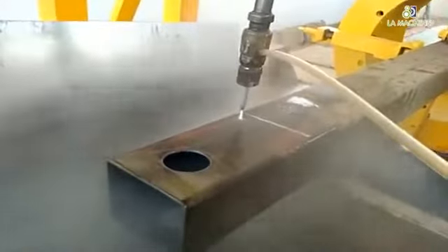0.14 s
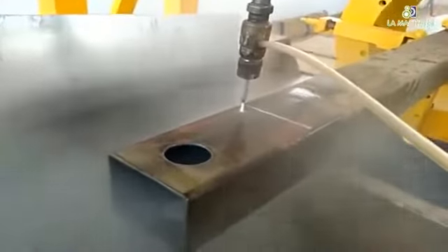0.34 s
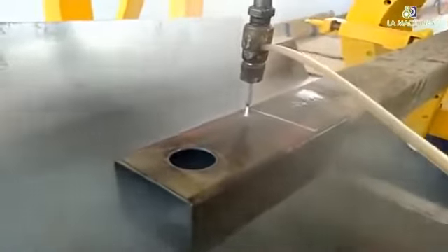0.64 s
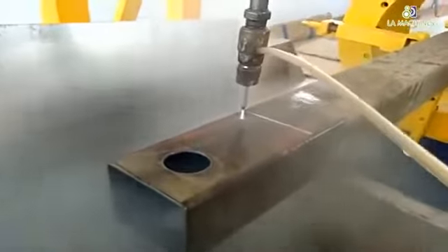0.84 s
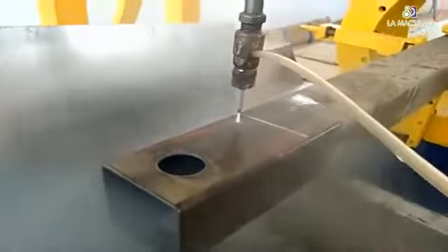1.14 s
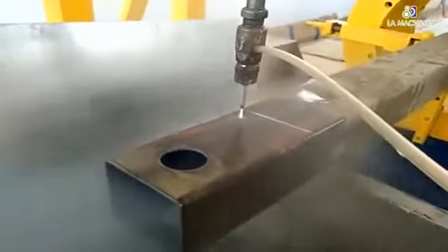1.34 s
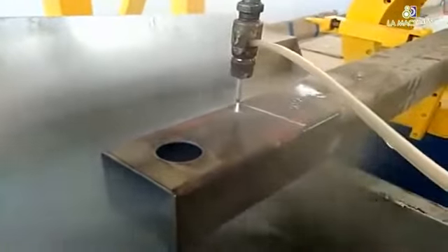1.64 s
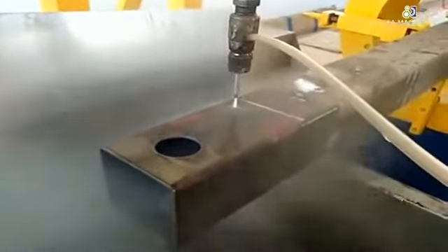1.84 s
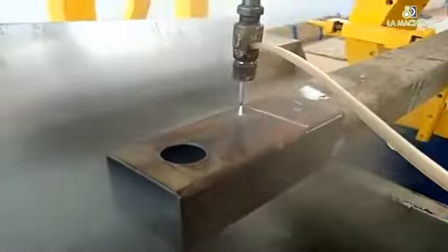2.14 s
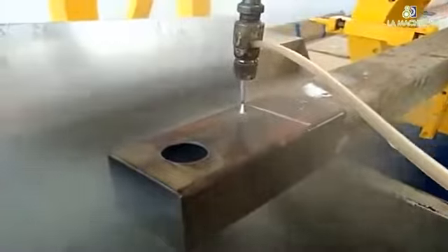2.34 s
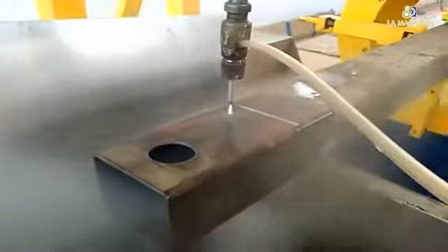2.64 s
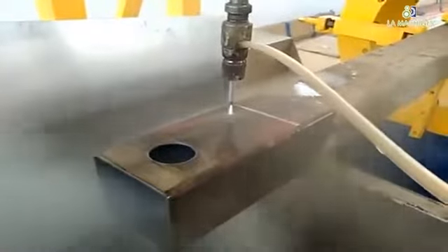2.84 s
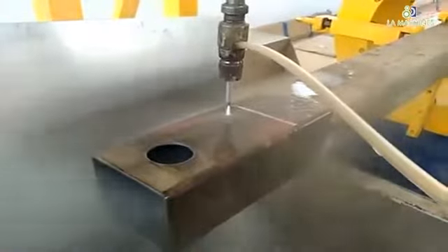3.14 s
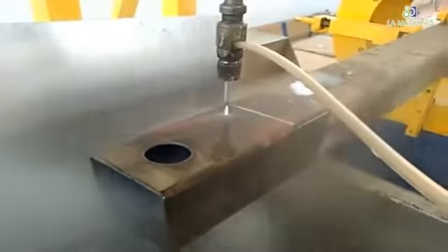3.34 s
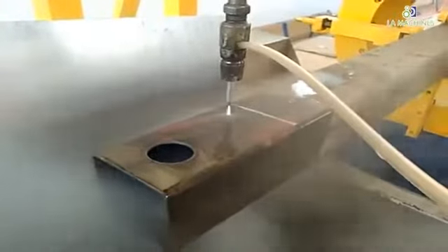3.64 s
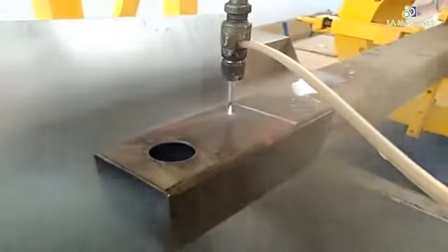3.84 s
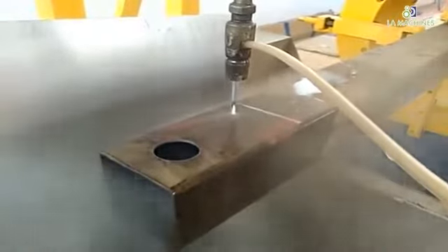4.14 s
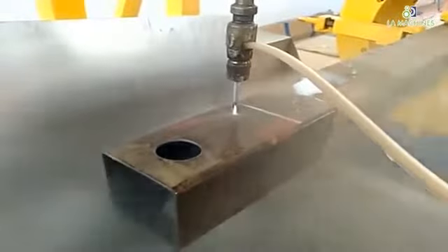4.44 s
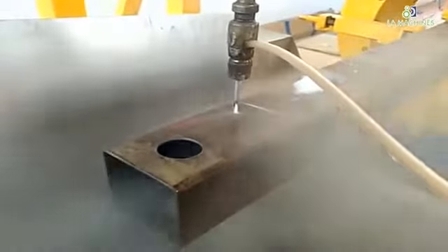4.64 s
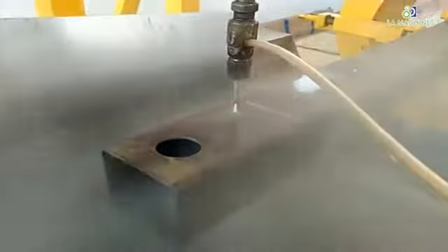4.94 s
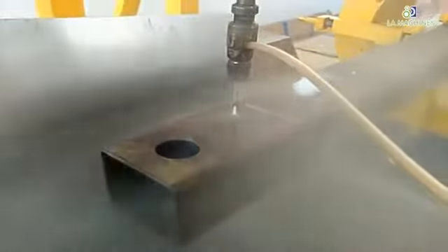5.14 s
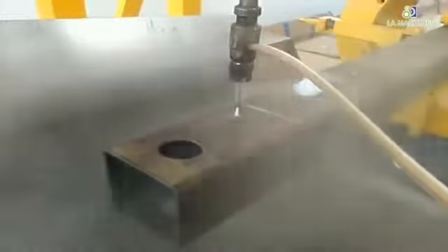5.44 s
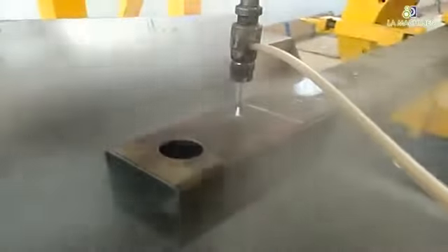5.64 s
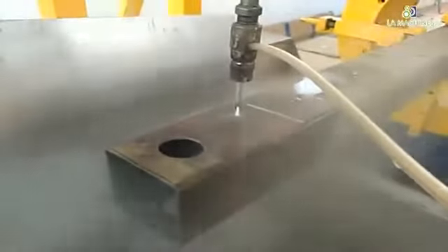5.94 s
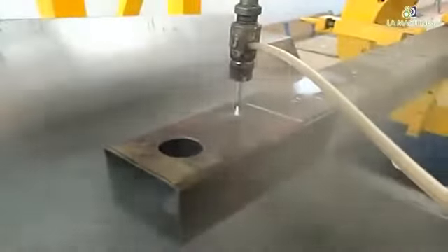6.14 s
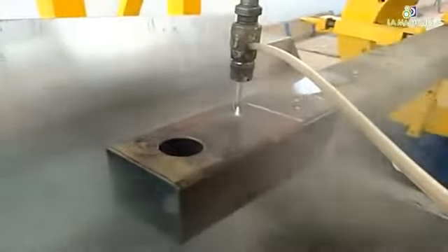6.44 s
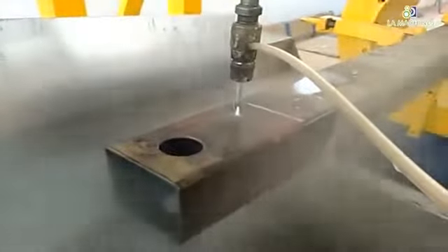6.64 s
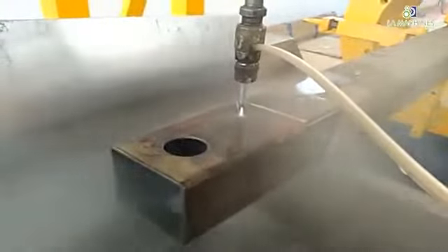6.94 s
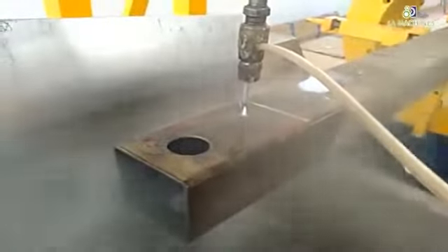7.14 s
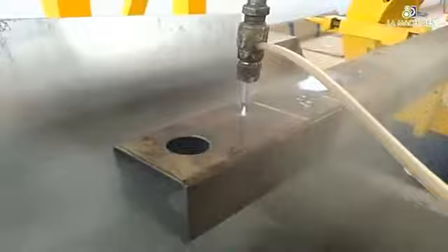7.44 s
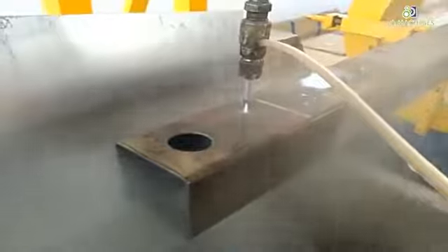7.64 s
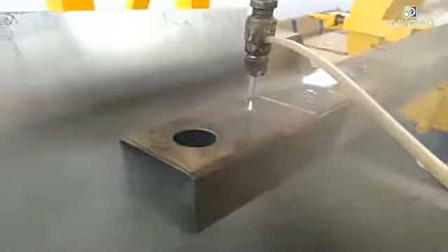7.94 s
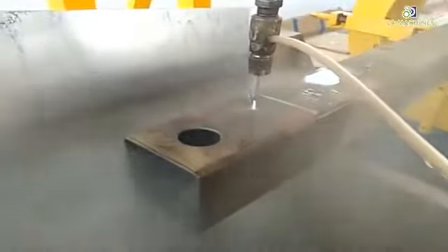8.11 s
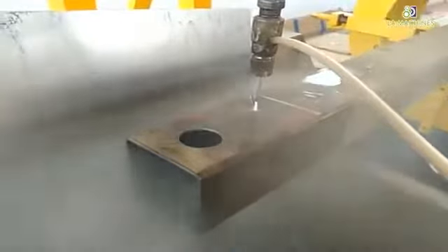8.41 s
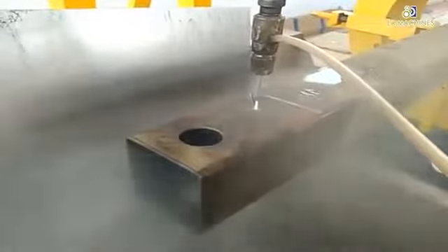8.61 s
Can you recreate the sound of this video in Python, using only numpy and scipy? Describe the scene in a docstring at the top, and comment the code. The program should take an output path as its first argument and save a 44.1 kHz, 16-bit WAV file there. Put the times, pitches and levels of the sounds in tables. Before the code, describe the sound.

A gritty high-pressure water jet cuts a steel tube in a workshop, already at full hiss when it begins. The bright, harsh noise peaks around five to six kilohertz, with narrow metallic ringing bands swelling and fading. A soft low gulp comes early, nearly buried. The roar builds gently, spray fizz thickens, and brief dips flick past. Very close microphone, slightly overloaded, nearly mono below the treble.

```python
"""A waterjet loaded with grit cuts along a steel tube in a workshop, heard from close by.
It hisses from the start as filtered noise, over a faint pump whine; one low gulp of water comes early.
The roar builds for a few seconds, while the fizz of spray thickens to the end.
All along, the tube and slot ring as narrow noise bands that swell and fade, with a few very short dips.
Last, the microphone squashes the loud mix and adds its own colour."""
import sys
import numpy as np
from scipy import signal
from scipy.fft import rfft, irfft
from scipy.io import wavfile
from scipy.ndimage import uniform_filter1d

SR = 44100
rng = np.random.default_rng(int(sys.argv[2]) if len(sys.argv) > 2 else 0)


def pcm_store(signal):
    """Save signal as 16-bit PCM."""
    levels = np.round(np.clip(np.atleast_2d(signal), -1, 1) * 32767)
    wavfile.write(sys.argv[1], SR, levels.astype(np.int16).T)


N = 386757

# noise is shaped in short overlapping frames: frame length and step, in samples
SIZE, HOP = 2048, 256
BIN_HZ = np.fft.rfftfreq(SIZE, 1 / SR)
FRAME_S = np.arange(N // HOP + 9) * HOP / SR
TIME_S = np.arange(N) / SR


def gain_of(db):
    """Turns decibels into an amplitude factor."""
    return 10 ** (np.asarray(db) / 20)


def evened(x):
    """Scales a signal to an average strength (rms) of 1."""
    return x / np.sqrt(np.mean(x ** 2) + 1e-20)


def read(points, hz):
    """Reads a table's value at any pitch, with straight lines on a log-pitch axis."""
    point_hz, value = np.transpose(points)
    return np.interp(np.log(hz + 1), np.log(point_hz + 1), value)


def coloured(x, points):
    """Filters a sound to a table of pitch_hz and level_db, without any sound arriving early."""
    filter_hz = abs(np.fft.fftfreq(SIZE, 1 / SR))
    log_gain = np.log(gain_of(read(points, filter_hz)))
    # the Hilbert transform finds the phase that keeps the filter causal
    response = np.exp(np.conj(signal.hilbert(log_gain)))
    taps = np.fft.ifft(response).real
    return signal.oaconvolve(x, taps)[:N]


def wander(rate_hz):
    """Random drift of rms 1, one value a frame; changes faster than the rate are weakened."""
    count = len(FRAME_S)
    drift_hz = np.fft.rfftfreq(count, HOP / SR)
    spectrum = rfft(rng.standard_normal(count))
    return evened(irfft(spectrum / np.sqrt(1 + (drift_hz / rate_hz) ** 4), count))


def noise(magnitude):
    """Makes noise whose strength follows a grid of frames x pitch bins."""
    real, imag = rng.standard_normal((2, *magnitude.shape))
    spectrum = magnitude * (real + 1j * imag)
    return signal.istft(spectrum.T, nperseg=SIZE, noverlap=SIZE - HOP)[1][:N]


def pump(pitch_hz=580, level_db=-36.5, waver_hz=2.46, waver_db=1.5):
    """The pump's faint whine: one sine, slightly unsteady in pitch and level (dB against the jet)."""
    hz = pitch_hz + waver_hz * np.interp(TIME_S, FRAME_S, wander(7.4))
    unsteady_db = level_db + waver_db * np.interp(TIME_S, FRAME_S, wander(5.2))
    whine = np.sin(2 * np.pi * np.cumsum(hz) / SR)
    return gain_of(unsteady_db) * evened(whine)


def gulp(at_s=.33, length_s=.06, level_db=-26, low_hz=85, high_hz=270):
    """One soft, low gulp of churned water in the tank: band-limited noise under a smooth bump."""
    band = signal.butter(2, [low_hz, high_hz], "band", fs=SR, output="sos")
    rumble = signal.sosfilt(band, rng.standard_normal(N))
    bump = np.exp(-((TIME_S - at_s) / length_s) ** 2)
    return gain_of(level_db) * evened(rumble) * bump


def standing_waves(count=5, ripple_db=1.3):
    """Echoes from tank and walls ripple the spectrum (dB); slow blends between ripples shift it."""
    ripples = uniform_filter1d(rng.standard_normal((count, len(BIN_HZ))), size=2, axis=1)
    place = np.linspace(0, count - 1, len(FRAME_S))[:, None] - np.arange(count)
    nearness = np.cos(np.pi / 2 * np.clip(place, -1, 1))
    # the ripple is weaker below 2000 Hz
    return ripple_db * (nearness @ evened(ripples)) * np.minimum(BIN_HZ / 2000, 1)


def flow(roar_drift_db=0.18, fizz_drift_db=0.43, drift_hz=2.8):
    """Roar and fizz in dB a frame: roar builds with the cut, then holds; spray thickens steadily."""
    roar_start_db, roar_full_db, roar_build_s = -1.4, 0.36, 4.5
    fizz_start_db, fizz_db_per_s = -2., 0.35
    built = np.minimum(FRAME_S / roar_build_s, 1)
    roar_db = roar_start_db + (roar_full_db - roar_start_db) * built
    fizz_db = fizz_start_db + fizz_db_per_s * FRAME_S
    return roar_db + roar_drift_db * wander(drift_hz), fizz_db + fizz_drift_db * wander(drift_hz)


# how strongly each pitch follows the roar's rise and fall: pitch_hz, share (a plain factor)
ROAR_FOLLOWING = [(60, 0.75), (500, 1.9), (1800, 1), (4000, 0.83), (5200, 0.067)]
# how strongly each pitch follows the spray's fizz: pitch_hz, share (a plain factor)
FIZZ_FOLLOWING = [(6000, 0.23), (7600, 0.66), (10000, 1), (13000, 0.27)]


def swelling(spray_db=2.0, spray_hz=22, churn_db=0.81, churn_hz=25):
    """Loudness factor per frame and pitch: the roar churns, the spray flutters, echoes ripple."""
    roar_db, fizz_db = flow()
    churning_db = roar_db + churn_db * wander(churn_hz)
    fluttering_db = fizz_db + spray_db * wander(spray_hz)
    swell_db = np.outer(churning_db, read(ROAR_FOLLOWING, BIN_HZ))
    swell_db += np.outer(fluttering_db, read(FIZZ_FOLLOWING, BIN_HZ))
    return gain_of(swell_db + standing_waves())


# resonances of tube and slot: pitch_hz, width_hz, level_db (relative),
# best_s (when the nozzle drives it most), fade_s (time from there to half power)
RESONANCES = [ (1176, 78, -19, 3, 8.1), (1312, 47, -17.5, 4.5, 5.6), (1614, 150, -20, 6, 4.2),
              (2043, 77, -17, 8, 6.1), (2280, 105, -16, 8, 4.8), (2473, 120, -14.5, -0.5, 6),
              (2754, 41, -7, 5, 6.4), (2907, 25, -6.5, 7, 2.1), (3104, 147, -10.5, 3.5, 3.8),
              (3460, 120, -11.5, 2.5, 2), (3544, 87, -13, 6, 7.8), (3810, 93, -12.5, 3, 4.1),
              (3850, 170, -9, 11, 1.8), (4010, 140, -15.5, 2, 7.9), (4120, 105, -11.5, 6, 2.9),
              (4217, 32, -3.5, 2, 2.4), (4310, 34, -8.5, 4, 8.1), (4600, 97, -13, 2.5, 5),
              (4830, 150, -13, -2, 3), (4990, 220, -11, 5.5, 4.8), (5030, 66, -6.5, 4, 0.93),
              (5123, 85, -1, -0.5, 5), (5162, 30, 5.5, 1, 1.4), (5200, 57, 1.5, 7, 1.6),
              (5360, 103, -1, -0.5, 4), (5370, 38, 0, 8, 2.1), (5453, 37, 0.9, 7, 3.1),
              (5540, 85, -4, 5, 2.4), (5636, 53, 2.5, 1.5, 1.6), (5640, 90, -0.5, 7.5, 0.92),
              (5772, 78, 1.5, 4, 4.2), (5990, 42, 3, 0.5, 1.05), (6070, 99, 0, 3, 4.9),
              (6390, 44, -1, 0.5, 0.9), (6571, 140, -7, 4.5, 0.93), (6770, 78, -7, 0, 3.2),
              (6870, 61, -5, 7, 1.5), (7250, 100, -10, 0, 4.5), (7550, 64, -1, 9, 2),
              (7610, 55, -2, 2, 1.6), (7740, 165, -1.35, 1, 6), (7930, 105, -0.5, 8.5, 1.1),
              (8040, 170, -4.5, 5, 2.2), (8290, 130, -4.5, 2.3, 1.4), (8444, 127, -6, 6.5, 3.1),
              (8610, 47, -5, 1.1, 1), (8717, 120, -8, 0.5, 2.7), (8800, 249, -9.5, 8.5, 3),
              (9230, 144, -9, -0.2, 0.55), (9300, 380, -14, 5, 3.8), (10060, 120, -9.5, 7, 1.6),
              (10480, 470, -13.5, 1.5, 5.6), (10600, 170, -0.5, 0, 0.63), (10880, 200, -15, 4.5, 1.5),
              (11300, 240, -6.5, 0.16, 0.55), ]


def ringing(flutter_db=1.5, flutter_hz=24):
    """Tube and slot ring as the nozzle passes; water sloshing in the slot shakes each resonance."""
    hz, width_hz, level_db, best_s, fade_s = np.transpose(RESONANCES)[:, :, None]
    passing = 1 / (1 + ((FRAME_S - best_s) / fade_s) ** 4)
    sloshing = np.array([wander(flutter_hz) for _ in RESONANCES])
    power = passing * gain_of(level_db + flutter_db * sloshing) ** 2
    power_shape = 1 / (1 + 2 * ((BIN_HZ - hz) / width_hz) ** 2) ** 2
    # the powers add up; the root turns them back into amplitude
    return np.sqrt(power.T @ power_shape)


# moments when the jet sputters: at_s, length_s (centre to about a third of the depth), depth_db
SPUTTER_DIPS = [(0.66, .015, 0), (1.398, 0.018, 2.5), (4.766, 0.014, 2), (4.88, 0.0046, 6),
                (5.152, 0.0063, 8), (6.85, .012, 3), (7.76, .012, 3)]


def faltering():
    """Each sputter of the jet dips the ringing briefly; gives a loudness factor per sample."""
    dip_db = np.zeros(N)
    for at_s, length_s, depth_db in SPUTTER_DIPS:
        dip_db += depth_db * np.exp(-((TIME_S - at_s) / length_s) ** 2)
    return gain_of(-dip_db)


# turbulent hiss of the jet before it swells: pitch_hz, level_db (relative, per Hz)
HISS_SPECTRUM = [(30, -23.5), (250, -24.5), (600, -23), (1000, -22.5), (1800, -23), (2500, -16.5),
                 (4000, -18), (4600, -18.5), (5200, -17), (6200, -8.5), (7100, -11.5), (8200, -20.5),
                 (9600, -20), (15000, -23.5)]


def jet(side_db=-11):
    """Turbulent hiss plus ringing metal, both noise; the cloud of mist gives some stereo width."""
    swell = swelling()
    hiss = swell * gain_of(read(HISS_SPECTRUM, BIN_HZ))
    rings = swell * ringing()
    mid = noise(hiss) + noise(rings) * faltering()
    side = gain_of(side_db) * noise(np.hypot(hiss, rings))
    return evened(np.array([mid + side, mid - side]))


def scene():
    """The pump behind, the water in the tank, and the jet in front."""
    return pump() + gulp() + jet()


# microphone colour: pitch_hz, level_db
MIC_COLOUR = [(30, -2), (5000, 1.5), (7800, 0), (9000, -4.5), (10500, -10.5), (12000, -14), (15000, -18.5)]
# stereo width, almost mono below the treble: pitch_hz, side_db (change to the left-right difference)
STEREO_WIDTH = [(1000, -58), (4000, -60), (4400, -22), (4750, -11), (5400, -15), (6300, -8), (8000, -5),
                (10000, 0), (14000, 1)]


def record(dry, out_db=-20.5, overload=1., edge_hz=15000):
    """The microphone saturates, so resonances crowd each other out; then width, colour, top limit."""
    # squashing at twice the sample rate keeps false tones out
    fine = signal.resample_poly(dry, 2, 1, axis=1)
    squashed = np.tanh(overload * fine)
    left, right = signal.resample_poly(squashed, 1, 2, axis=1)
    mid = (left + right) / 2
    side = coloured((left - right) / 2, STEREO_WIDTH)
    heard = np.array([coloured(mid + side, MIC_COLOUR), coloured(mid - side, MIC_COLOUR)])
    levelled = gain_of(out_db) * evened(heard)
    band_limit = signal.firwin(511, edge_hz, window=("kaiser", 9), fs=SR)
    return signal.oaconvolve(levelled, band_limit[None], "same")


dry = scene()
out = record(dry)
pcm_store(out)
```